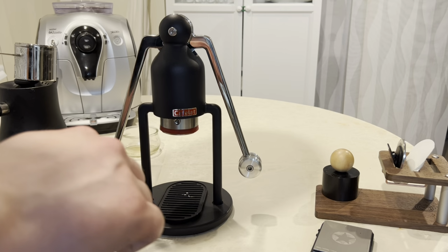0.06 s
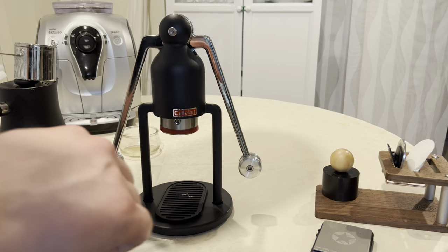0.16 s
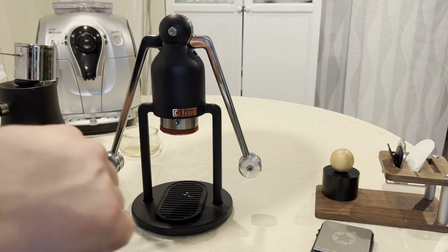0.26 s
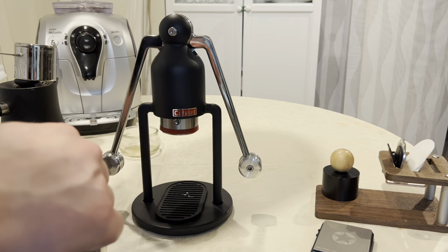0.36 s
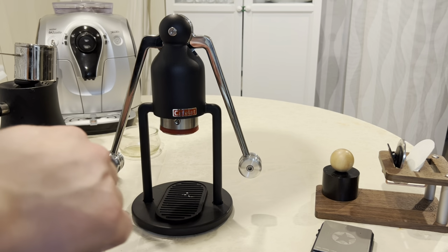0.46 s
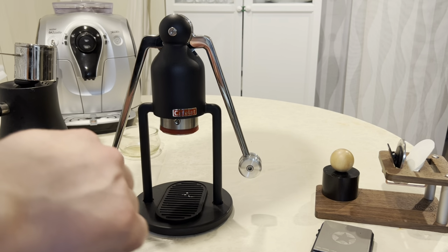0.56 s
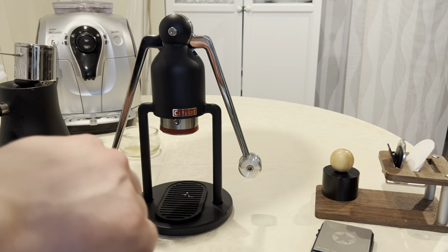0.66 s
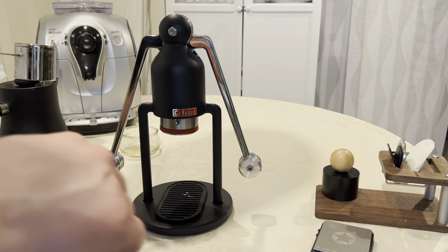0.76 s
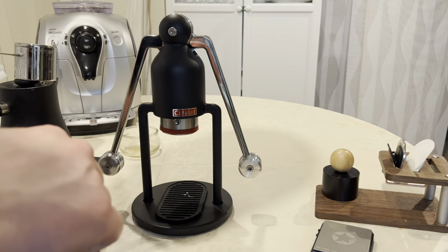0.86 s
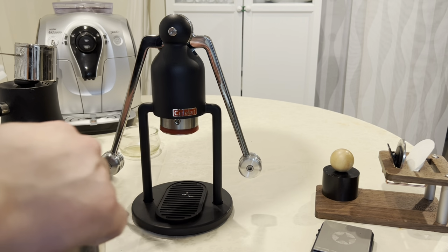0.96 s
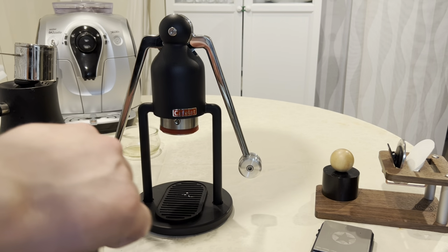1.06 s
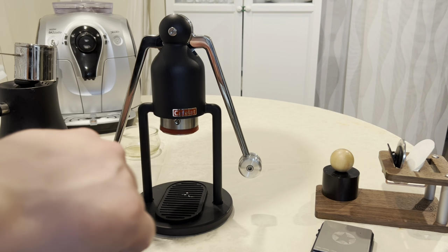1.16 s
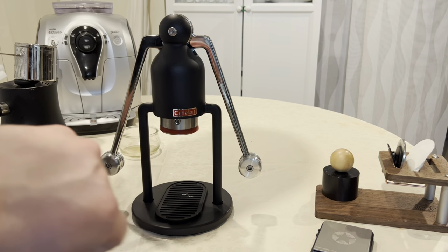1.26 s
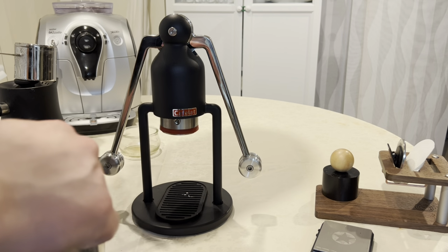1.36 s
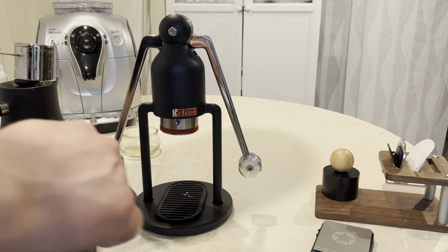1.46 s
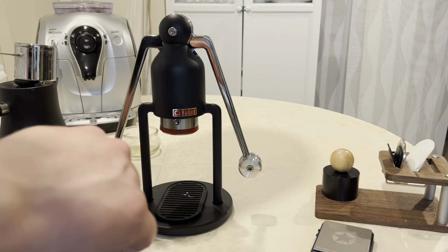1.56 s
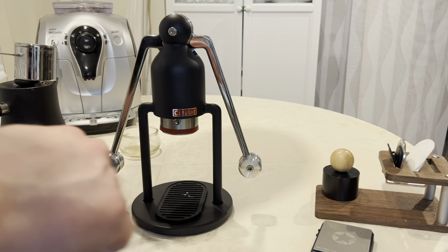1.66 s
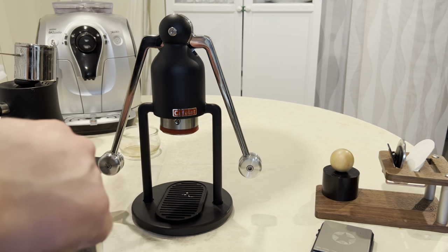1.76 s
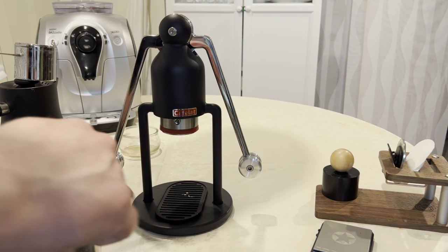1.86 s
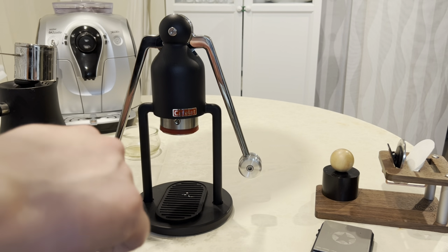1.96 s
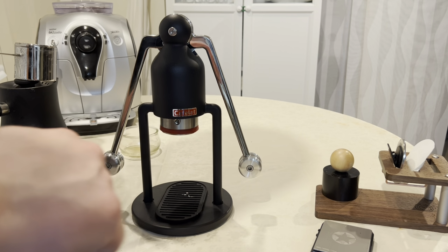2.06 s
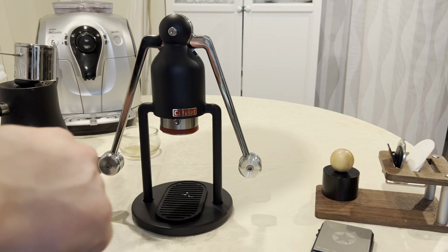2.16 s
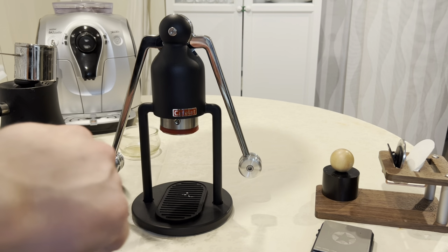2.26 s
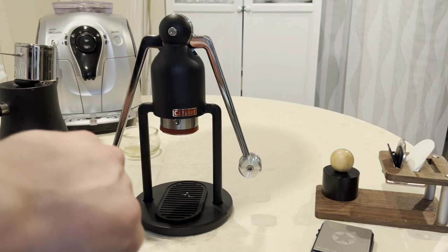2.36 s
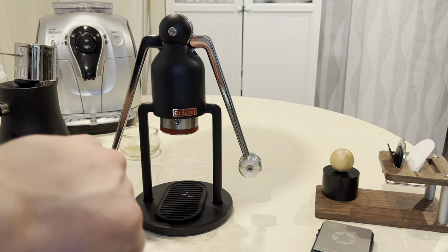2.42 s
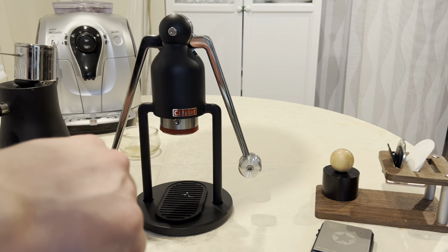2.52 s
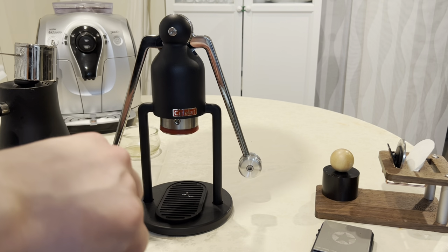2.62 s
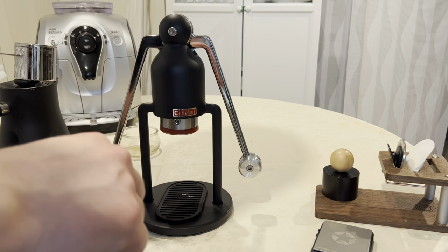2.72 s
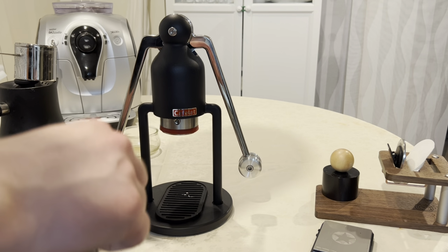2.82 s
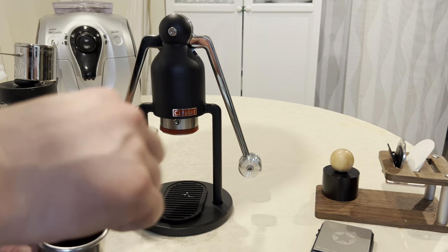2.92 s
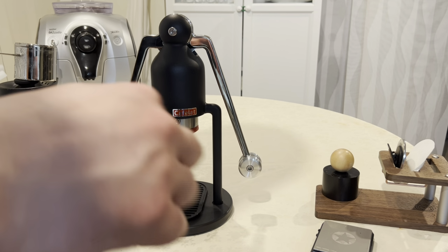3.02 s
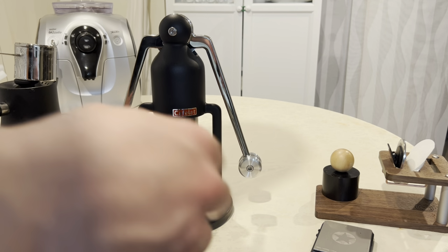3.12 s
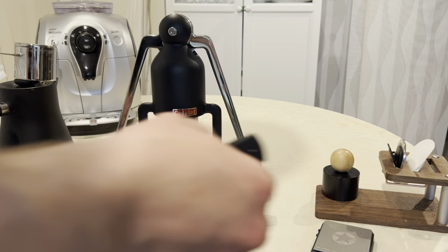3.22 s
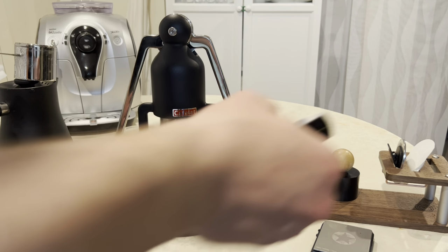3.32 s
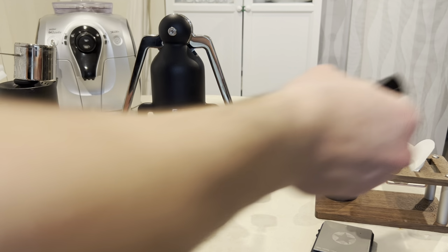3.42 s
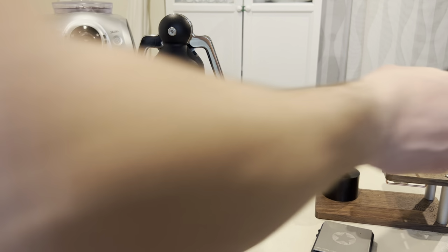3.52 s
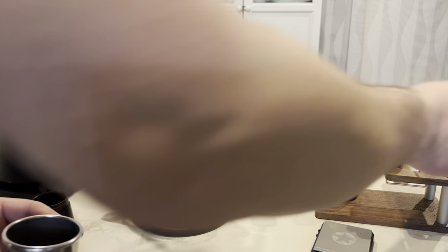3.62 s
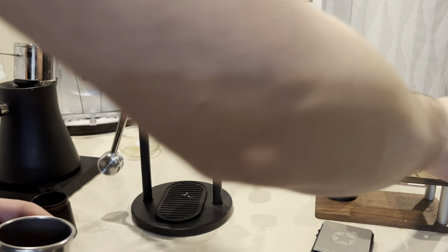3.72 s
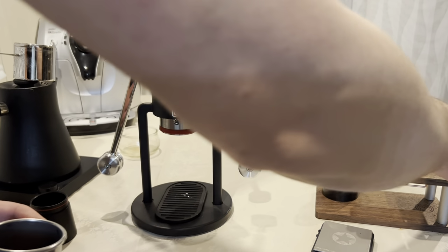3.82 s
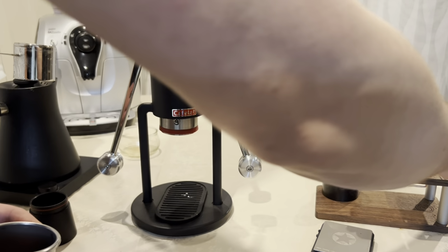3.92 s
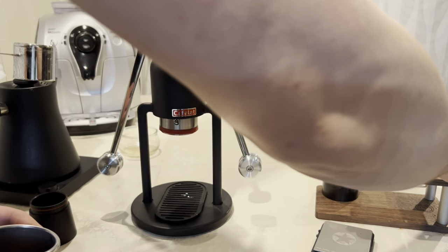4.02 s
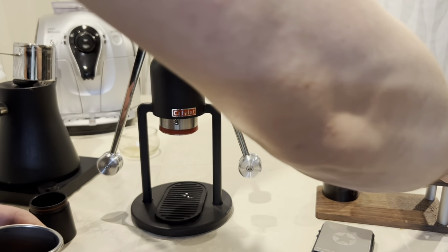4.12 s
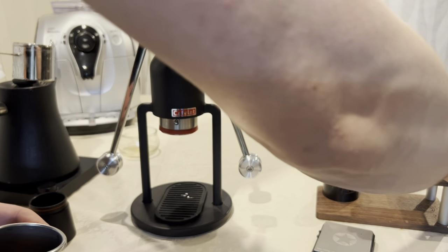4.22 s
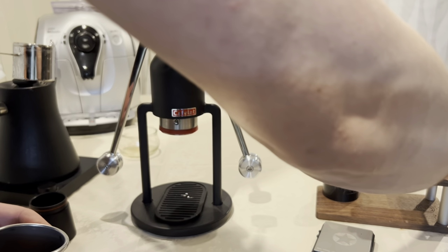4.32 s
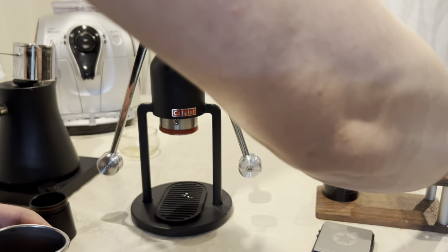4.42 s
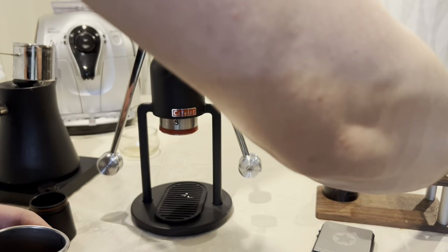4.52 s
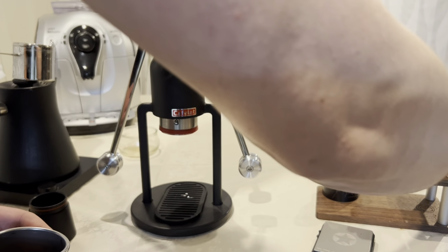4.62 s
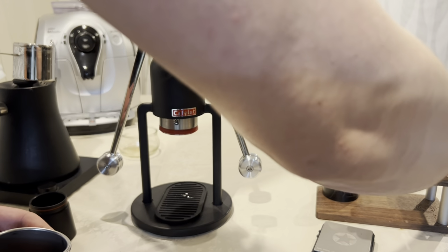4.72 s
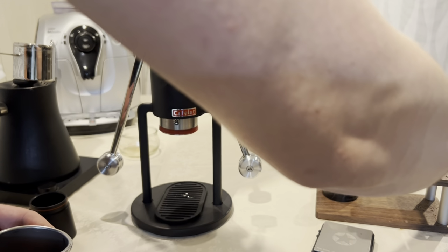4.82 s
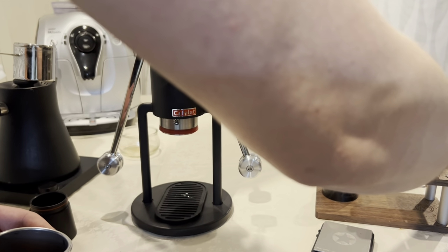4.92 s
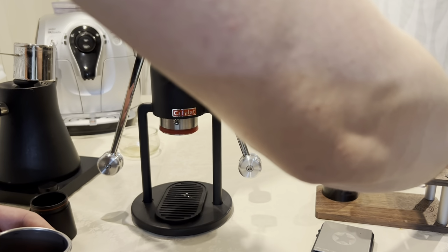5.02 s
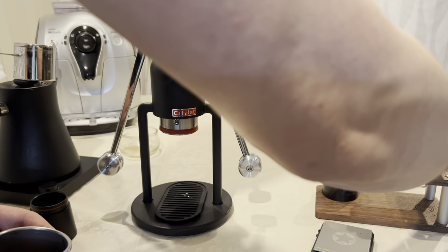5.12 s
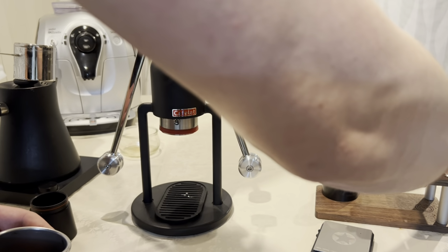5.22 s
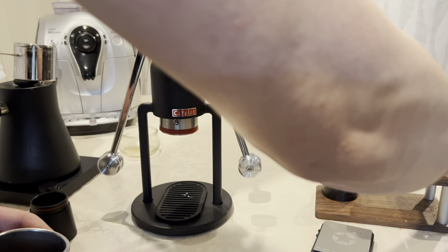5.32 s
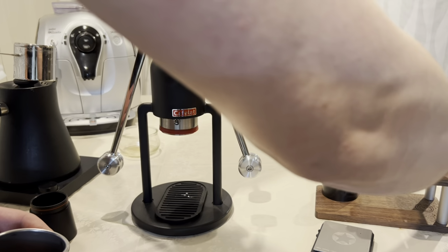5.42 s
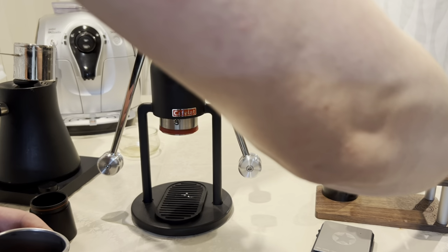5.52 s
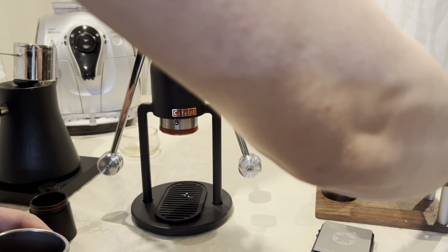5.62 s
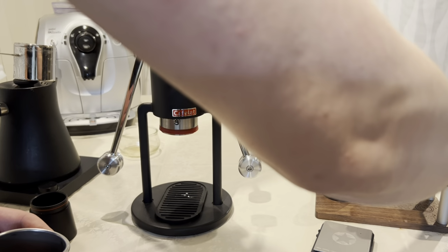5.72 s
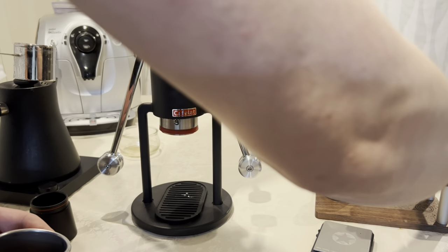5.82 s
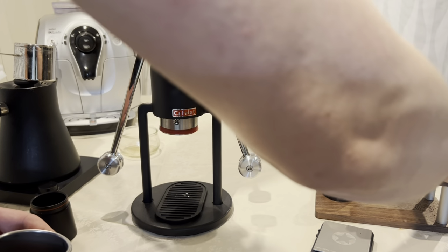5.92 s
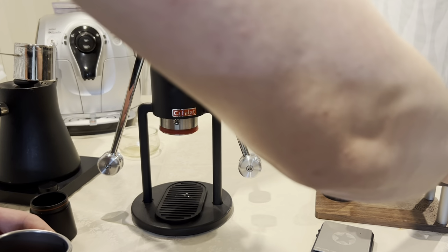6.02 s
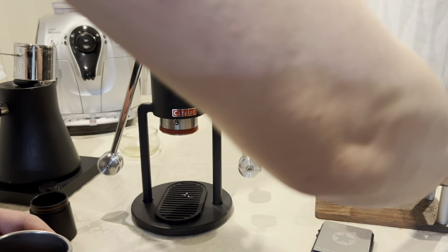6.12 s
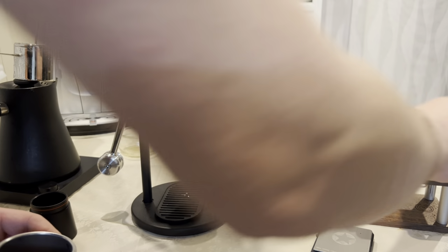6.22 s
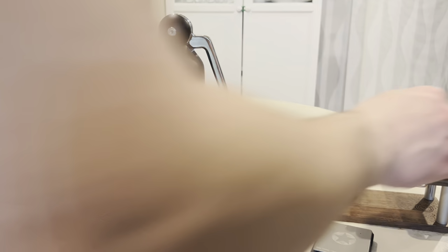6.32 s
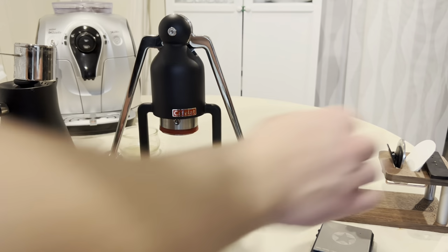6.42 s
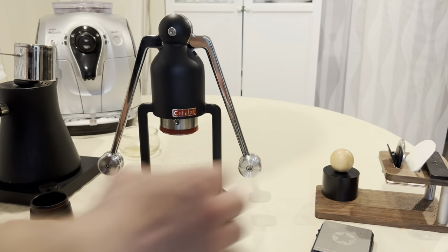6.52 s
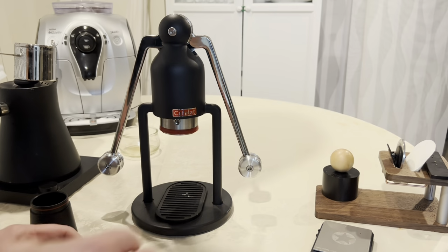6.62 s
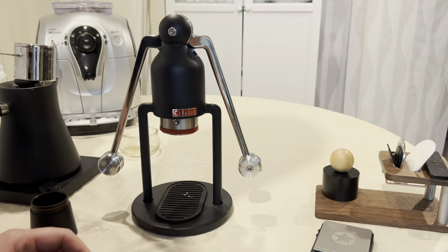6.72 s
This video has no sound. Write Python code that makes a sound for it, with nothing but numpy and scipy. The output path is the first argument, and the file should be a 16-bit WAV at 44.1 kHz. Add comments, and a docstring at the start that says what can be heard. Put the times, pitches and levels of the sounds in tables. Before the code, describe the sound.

From the start until about 2.5 seconds, fine needles stir ground coffee in a steel basket, close and slightly left. Uneven strokes make a soft, gritty crunch and a wavering hollow note, dotted with quick scrapes and ringing taps on the wall, sharpest near 0.8 and 2.3 seconds. Around 2.8 seconds the needles lift out with two tiny, high squeaks and faint twangs. After a lull, from about 3.9 to 5.6 seconds, they tick lightly and irregularly against their stand, a little further away, with a small ringing nudge and soft thud near 5 seconds. At 6 seconds the tool drops home with a brief rattling knock, the loudest sound, and a low thud through the table. It fades quickly in the small kitchen. Throughout there is a faint steady hiss and low background noise, which dips around 1 and 3 seconds and returns near 2.4 and 5.

```python
"""At a kitchen table, fine needles stir ground coffee in a steel basket, scraping and tapping its wall.
The grounds crunch, the basket hums a hollow note, and the needles squeak and twang as they are lifted out.
They tick against their stand while the tool is lined up. Then it drops home with a rattling knock
that thuds through the table. Under it all lie a faint hiss and low background noise
that the recorder's noise suppressor turns up and down."""
import sys
import numpy as np
from scipy import signal
from scipy.fft import rfft, irfft, next_fast_len
from scipy.io import wavfile
from scipy.ndimage import uniform_filter1d

SR = 44100
rng = np.random.default_rng(int(sys.argv[2]) if len(sys.argv) > 2 else 0)


def store_pcm(level_fs):
    """Save levels as 16-bit WAV."""
    pcm = np.round(np.clip(level_fs, -1, 1) * 32767).astype(np.int16)
    wavfile.write(sys.argv[1], SR, np.atleast_2d(pcm).T)


N = 298557
TIME = np.arange(N) / SR
SIDES = np.array([[1], [-1]])  # plus for the left ear, minus for the right

# The steel basket's modes, the tones it rings with. Each row: pitch in Hz, level in dB, seconds to
# fade by 60 dB (called t60), left minus right level in dB, how far the left wave leads in radians.
BASKET_MODES = [(704, -12.5, 0.054, 1.5, 6.5), (1054, 9, 0.024, 2, 2.5), (1207, -4, .025, -15, -1.96),
                (1534, -1.5, 0.014, 1.5, 2), (1686, -10, 0.056, 3, -1.3), (3432, -12.5, .03, 10, 4.2),
                (3681, -5.5, 0.034, 6, 0.4), (3850, -30.5, 0.066, 0.5, -0.4), (5043, -16.5, 0.03, 12, -0.5),
                (6150, -7, 0.042, 3.5, -2.5), (8340, -5.5, 0.012, 1, 1.67), (11100, -21.5, 0.02, 3.5, -6),
                (12000, 1.5, 0.021, -3, -9), (14000, -7, .008, -1, 3.5)]


def from_db(db):
    """Turn decibels into a number to multiply by."""
    return 10 ** (np.asarray(db) / 20)


def rms_one(x):
    """Scale a signal to an average power of 1."""
    return x / np.sqrt(np.mean(x ** 2) + 1e-20)


def at_hz(points, hz):
    """Read between a table's rows, with every octave equally wide."""
    known_hz, values = np.transpose(points)
    return np.interp(np.log(np.maximum(hz, 1)), np.log(known_hz), values)


def band(x, hz, kind, order=2):
    """Keep the lows, the highs or a band between two frequencies."""
    sections = signal.butter(order, np.clip(hz, 10, SR * .45), kind, fs=SR, output="sos")
    return signal.sosfilt(sections, x + 1e-18)


def drift(per_s):
    """Wander around zero, heading for a new random value per_s times a second."""
    targets = rng.standard_normal(2000)
    return np.interp(TIME * per_s, np.arange(len(targets)), targets)


def pan(db):
    """Left and right gains that make the left louder by db."""
    return from_db(SIDES * db / 2)


def stereo_noise(size, alike):
    """White noise for two ears: unrelated when alike is 0, the same when it is 1."""
    mid, side = rng.standard_normal((2, size))
    return (np.sqrt(1 + alike) * mid + np.sqrt(1 - alike) * side * SIDES) / np.sqrt(2)


def coloured(noise, colour):
    """Give noise its own balance of low and high sound, at a power of 1."""
    size = next_fast_len(noise.shape[1])
    gains = from_db(at_hz(colour, np.fft.rfftfreq(size, 1 / SR)))
    return rms_one(irfft(rfft(noise, size) * gains, size)[:, :noise.shape[1]])


def convolve(x, response):
    """Let every sample of x set off a copy of a stereo response."""
    return signal.oaconvolve(np.atleast_2d(x), response, axes=-1)[:, :N]


def ring(force, modes, vary_db=0):
    """A struck object rings in fading tones; vary_db wavers their levels as the contact point moves."""
    out = np.zeros((2, N))
    for hz, db, t60, pan_db, lead in modes:
        decay, turn = from_db(-60 / (t60 * SR)), 2 * np.pi * hz / SR
        push = force * from_db(db + vary_db * drift(25))
        swing = signal.lfilter([1], [1, -decay * np.exp(1j * turn)], push + 1e-18)
        out += pan(pan_db) * np.imag(swing * np.exp(.5j * lead * SIDES))
    return out


def crack(force, colour, t60, pan_db, alike):
    """A contact starts with a crowd of quickly dying tones, made here as a burst of noise."""
    t = TIME[:SR // 8]
    noise = coloured(stereo_noise(len(t), alike), colour)
    return convolve(force, pan(pan_db) * noise * from_db(-60 * t / t60))


def grains(per_s, spread_db):
    """Tiny slips of uneven size at random moments."""
    sizes = from_db(spread_db * np.minimum(rng.exponential(1, N), 4)) * rng.choice([-1, 1], N)
    return rms_one(sizes * (rng.random(N) < per_s / SR))


def contacts(rows, chatter, low_db, mid_db, high_db, low_follows=.35, length_s=.001):
    """Each contact is a click and a fading run of slips. Harder is brighter, as the bass grows less."""
    force, t = np.zeros((3, N)), TIME[:SR // 12]
    slips = grains(3000, spread_db=0.91)
    usual_db = np.mean([row[1] for row in rows])
    for start, db, treble_db, *own_length in rows:
        at = round(start * SR)
        length = own_length[0] if own_length else length_s
        burst = chatter * slips[at:at + len(t)] * np.exp(-(t / length) ** 2)
        burst[0] += 1  # the click
        levels = [[low_db + low_follows * (db - usual_db)], [db + mid_db], [db + treble_db + high_db]]
        force[:, at:at + len(t)] += from_db(levels) * burst / np.linalg.norm(burst)
    low, mid, high = force
    return band(low, [150, 1400], "band") - band(mid, [1300, 4700], "band") + band(high, 4700, "high")


def blows(rows):
    """One clean, sharp push for each row."""
    force = np.zeros(N)
    for start, db in rows:
        force[round(start * SR)] = from_db(db)
    return force


def gliding_noise(hz, width_hz):
    """Rubbing makes a breathy note around a moving pitch; the real part of the result is the sound."""
    decay = np.exp(-np.pi * width_hz / SR)
    slow_noise = signal.lfilter([1], [1, -decay], rng.standard_normal((2, N)))
    real, imaginary = rms_one(band(slow_noise, 2 * width_hz, "low", order=1))
    return (real + 1j * imaginary) * np.exp(2j * np.pi * np.cumsum(hz) / SR)


def background():
    """Low background noise that the recorder's noise suppressor turns up and down, and a steady hiss."""
    # How much low noise the suppressor lets through. Each row: time in seconds, level in dB.
    suppressor_levels = [(0, -57), (.79, -57), (.94, -70), (2.3, -65.5), (2.47, -59.5), (3.04, -57.5),
                         (3.1, -67.5), (3.5, -71.5), (4.5, -68.5), (5.1, -58.5), (6.77, -57)]
    # The colours of the two noises. Each row: frequency in Hz, relative level in dB.
    low_colour = [(15, -39), (25, -10.5), (55, -1.5), (160, -4.5), (186, -3), (210, -5), (237, -2.5),
                  (306, 3), (377, -8), (591, -17), (657, -32), (687, -39), (900, -26), (1170, -51.5),
                  (1980, -120)]
    hiss_colour = [(250, -29), (450, 0), (700, 3.5), (820, -6.5), (1100, -3.5), (1700, 0), (2500, -14.5),
                   (5500, -17.5), (8700, -21.5), (10300, -34.5), (11800, -18), (14000, -17), (16000, -25.5)]
    times, levels_db = np.transpose(suppressor_levels)
    suppressor_gain = from_db(np.interp(TIME, times, levels_db) - 1)
    low_noise = suppressor_gain * coloured(stereo_noise(N, alike=0.92), low_colour)
    hiss = from_db(-73) * pan(1.2) * coloured(stereo_noise(N, alike=0.12), hiss_colour)
    return low_noise + hiss


def swell(age, after, attack_s, t60):
    """Rise steadily, hold, then die away after the end."""
    return np.minimum(age / attack_s, 1) * from_db(-60 * after / t60)


def strokes(rest_hz=954.5, rise_hz=118, settle_s=.14):
    """Each stroke bites, eases off and stops. Gives the note's pitch, its gain and the grit's gain."""
    # Each row: start and end in seconds, note level in dB, grit level in dB, fade over the stroke in dB.
    hand_strokes = [(-0.06, 0.128, -50.5, -63.5, 4.5), (0.193, 0.264, -44, -55, 9),
                    (0.274, 0.4, -47.5, -56.5, 7), (0.471, 0.72, -44, -61, 12), (0.767, 0.986, -48, -62, 5),
                    (0.991, 1.23, -47, -59, 8), (1.217, 1.823, -52.5, -65, -0.5),
                    (1.839, 2.12, -49.5, -61, 3), (2.179, 2.36, -45, -69, 2.5),
                    (2.371, 2.474, -43.5, -99, 21.5)]
    hz, note, grit = np.full(N, rest_hz), 0, 0
    for start, end, note_db, grit_db, fade_db in hand_strokes:
        age, after = np.maximum(TIME - start, 0), np.maximum(TIME - end, 0)
        eased_db = fade_db * np.minimum(age / (end - start), 1)
        note = np.maximum(note, from_db(note_db - eased_db) * swell(age, after, attack_s=.035, t60=.16))
        # the grounds take longer to start and to stop moving
        grit = np.maximum(grit, from_db(grit_db - eased_db) * swell(age, after, attack_s=.047, t60=1))
        # the note starts high and settles as the needles loosen the grounds
        hz = np.where(age > 0, rest_hz + rise_hz * np.exp(-age / settle_s), hz)
    return hz, note, grit


def stirring(waver=.06, wander=0.038, lead_radians=0.23):
    """Needles plough the grounds: the basket hums a wavering hollow note and grit rings its steel."""
    hz, note_gain, grit_gain = strokes()
    hollow = gliding_noise(hz * (1 + waver * drift(45) + wander * drift(10)), width_hz=124)
    hollow = pan(6.4) * np.real(hollow * np.exp(.5j * lead_radians * SIDES))
    # the grit comes in clumps as the needles break through the grounds
    clumps = grit_gain * from_db(2.5 * drift(50))
    steel = from_db(-22) * ring(grains(2900, spread_db=5.5) * clumps, BASKET_MODES, vary_db=2.5)
    crunch = np.sqrt(np.abs(uniform_filter1d(grains(1800, spread_db=2.5) ** 2, size=40)))
    # The colour of the crunching grounds. Each row: frequency in Hz, relative level in dB.
    grit_colour = [(250, -27.5), (600, -12.5), (1100, 2.5), (1400, -5.5), (1650, 8), (2200, -2), (3100, -8),
                   (4500, -4.5), (6200, -11), (7200, -17), (11000, -17), (13500, -4.5), (15500, -33)]
    grounds = clumps * crunch * pan(6) * coloured(stereo_noise(N, alike=0.47), grit_colour)
    return note_gain * from_db(-3 + drift(25)) * hollow + steel + grounds


def basket_hits():
    """Needles scrape and tap the steel wall and make it ring."""
    # Each row: start in seconds, level in dB, extra treble in dB and, for scrapes, length in seconds.
    scrapes = [(0.029, -46.5, -41, 0.0061), (0.1175, -36.5, -18, 0.0055), (0.181, -44.5, -33, 0.0047),
               (0.2095, -41, -8, .011), (0.2935, -43.5, -34, 0.0059), (0.5842, -43, -5, 0.029),
               (0.7044, -45, -42, .011), (0.7785, -31, -39, 0.007), (0.791, -31.5, -20, 0.0065),
               (0.828, -48, 2, 0.013), (0.877, -47.5, -11, 0.01), (1.06, -46.5, -20, 0.0067),
               (1.0887, -38.5, -24, 0.017), (1.2435, -34, -11, 0.012), (1.2554, -44.5, 1, .006),
               (1.3218, -46, -5, 0.023), (1.5118, -42.5, -24, 0.015), (1.6785, -41.5, -4, 0.0063),
               (1.922, -41, -7, 0.0052), (2.081, -39, -7, 0.0042), (2.2386, -43, -0.5, 0.03)]
    taps = [(0.5219, -37.5, -3.5), (0.5286, -45.5, -14), (0.782, -37.5, -14), (1.1855, -48.5, -33),
            (1.426, -53.5, -36), (2.0765, -39.5, -23), (2.286, -28.5, -1), (2.3, -33.5, -9),
            (2.482, -53.5, -45), (2.6932, -55.5, -44)]
    # The colour of the basket's crack. Each row: frequency in Hz, relative level in dB.
    crack_colour = [(200, -29.5), (500, -9), (1000, -0.5), (1700, 8), (2600, 2.5), (4500, 1.5),
                    (6200, -0.5), (7200, 2.5), (11000, -2.5), (13500, -2.5), (16000, -4)]
    scrape = contacts(scrapes, chatter=0.23, low_db=-50, mid_db=0, high_db=-3.5, low_follows=.3)
    tap = contacts(taps, chatter=0.081, low_db=-42.5, mid_db=-5, high_db=5,
                   low_follows=0.74, length_s=0.00027)
    rasp = from_db(-1) * crack(scrape, crack_colour, t60=0.014, pan_db=4.5, alike=.5)
    snap = from_db(0.5) * crack(tap, crack_colour, t60=0.021, pan_db=1, alike=1)
    return ring(scrape + tap, BASKET_MODES) + rasp + snap


def glides(rows):
    """Pitch and gain of short slides: each swells and fades while its pitch moves steadily."""
    hz, gain = np.full(N, float(rows[0][2])), np.zeros(N)
    for start, length, first_hz, last_hz, db in rows:
        along = np.clip((TIME - start) / length, 0, 1)
        hz = np.where(along > 0, first_hz + (last_hz - first_hz) * along, hz)
        gain += from_db(db) * np.sin(np.pi * along)
    return hz, gain


def needle_squeaks():
    """Sliding needles sing briefly, gliding in pitch as their free length changes."""
    # Slides along the wall, then squeaks on leaving the basket.
    # Each row: start and length in seconds, first and last pitch in Hz, level in dB.
    wall_slides = [(1.017, .055, 1850, 1400, -54), (1.087, .035, 1770, 1760, -52.5),
                   (1.179, .016, 1665, 1605, -46), (2.195, .09, 2080, 1720, -54)]
    exit_squeaks = [(2.752, 0.073, 8060, 8500, -73), (2.82, .046, 8860, 7270, -70)]
    slide_hz, slide_gain = glides(wall_slides)
    squeak_hz, squeak_gain = glides(exit_squeaks)
    slide = slide_gain * gliding_noise(slide_hz, width_hz=100).real
    squeak = gliding_noise(squeak_hz, width_hz=360).real
    overtone = from_db(6) * gliding_noise(1.64 * squeak_hz, width_hz=1600).real
    return pan(6) * slide + squeak_gain * (squeak + overtone)


def needle_twangs():
    """A needle springs free of the rim and rings as it bends back and forth."""
    # Each row: start in seconds, level in dB.
    releases = [(2.767, -73.5), (2.855, -65)]
    bending_mode = (3610, 0, 0.12, 3.4, 0.52)  # laid out like a row of BASKET_MODES
    return ring(blows(releases), [bending_mode])


def lining_up(needle_count=4, pitch_spread=0.04):
    """Needles of slightly different pitch, and the handle, touch the stand as the tool is lined up."""
    # Touches on the stand. Each row: start in seconds, level in dB, extra treble in dB.
    needle_ticks = [(3.8934, -73.5, 1.5), (4.1624, -57, -3), (4.2053, -56.5, 4), (4.3236, -67, -1),
                    (4.3752, -61.5, 4.5), (4.433, -63, -5), (4.459, -48.5, -1), (4.5281, -55, -28),
                    (4.7273, -49, -7.5), (4.79, -51.5, -6), (4.9604, -59, -9), (5.385, -47.5, -3.5),
                    (5.4165, -48, -35), (5.556, -65.5, 15.5)]
    handle_nudges = [(5.0595, -43, -14.5), (5.143, -75, 11), (5.2614, -61, -22)]
    # The tones of the needles and of the free handle.
    # Each row: pitch in Hz, level in dB, t60 in seconds, left minus right in dB, left lead in radians.
    needle_modes = [(3140, -19.5, 0.061, -1, 0.0011), (3540, -12.5, 0.011, 12, 0.52),
                    (6030, -10, 0.016, -3, 0.82), (7500, -30, 0.011, -5, 0.67),
                    (8690, -9, 0.038, -14, 0.61)]
    handle_modes = [(1082, 0.5, 0.11, 3, 0), (2132, -0.5, 0.075, 4.5, 0.045), (2560, -38, 0.028, 4, 0),
                    (3360, 2.5, 0.038, 5, 0.24)]
    # The colour of the needles' crack. Each row: frequency in Hz, relative level in dB.
    crack_colour = [(600, -5), (2000, -10), (3200, -2), (5000, -6.5), (8600, 1.5), (10500, -11), (13000, 2),
                    (16000, -1)]
    ticks = [contacts(needle_ticks[k::needle_count], chatter=0.74, low_db=-92, mid_db=1, high_db=0.5,
                      length_s=0.0043) for k in range(needle_count)]
    needles = 0
    for tick, detune in zip(ticks, np.linspace(-1, 1, needle_count)):
        modes = [(hz * (1 + pitch_spread * detune), *rest) for hz, *rest in needle_modes]
        needles = needles + ring(tick, modes, vary_db=2.5)
    nudge = contacts(handle_nudges, chatter=0.06, low_db=-90, mid_db=-8, high_db=1.5,
                     low_follows=0.66, length_s=0.003)
    snap = from_db(0.5) * crack(sum(ticks) + nudge, crack_colour, t60=0.013, pan_db=6, alike=0.31)
    # the needles rub on for a moment after each touch
    rustle = from_db(-10.5) * crack(sum(ticks), crack_colour, t60=0.14, pan_db=9, alike=0.57)
    return needles + ring(nudge, handle_modes) + snap + rustle


def table_thuds():
    """The rocking stand sets the table top booming."""
    # Each row: start in seconds, level in dB.
    thuds = [(5.062, -52), (5.089, -57), (5.999, -47), (6.011, -39.5), (6.039, -37.5), (6.0845, -39)]
    # The table top's two low tones, laid out like BASKET_MODES.
    table_modes = [(179, -1.5, 0.21, 0.0012, 0.025), (216.3, -1.7, 0.24, 0.0078, 0.001)]
    return ring(blows(thuds), table_modes)


def dropping_home():
    """The tool drops into the stand and rattles to rest."""
    # The drop and its bounces. Each row: start in seconds, level in dB, extra treble in dB.
    knocks = [(5.9942, -21, -15), (5.998, -40.5, -8), (6.006, -28, -10), (6.011, -22, -12.5),
              (6.018, -23.5, -19.5), (6.0575, -24.5, -8.5), (6.064, -47.5, -6), (6.072, -30, -22),
              (6.098, -53, 9)]
    # The tones of the stand with the tool in it.
    # Each row: pitch in Hz, level in dB, t60 in seconds, left minus right in dB, left lead in radians.
    stand_modes = [(400, -9, .08, 7, -0.097), (659, -16, 0.055, -3.5, -0.22),
                   (953, -6.5, 0.12, -0.5, -0.49), (1063, -21, 0.038, -0.5, -.3),
                   (1277, -4, 0.059, -3, -0.14), (1490, -8.5, 0.13, -6.5, 0), (1960, 2.5, .09, 0, 0),
                   (2023, -12.5, 0.14, 1.5, -0.07), (2150, -8, 0.088, 3.5, -0.12),
                   (2033, -7, 0.06, 2, 0.92), (2110, -9, .13, -0.5, 0.093),
                   (2440, -14.5, 0.066, 1.5, 0.093), (2320, -27.5, 0.11, 1, 0), (2680, -18.5, .09, 1, 0.5),
                   (2780, -2.5, 0.046, 2.5, -0.41), (3010, -21, 0.062, -1.5, 0.32),
                   (3130, -17.5, 0.085, 0, .3), (3600, -31, 0.17, 5, .3), (3900, -15, 0.13, 10.5, 1.5),
                   (4225, -27, 0.22, 13, 0.35), (5800, -29.5, 0.142, 14.5, 0.41),
                   (6010, -29.5, 0.31, 17.5, -0.18), (8530, -12, 0.077, 8, -0.28)]
    # The colour of the stand's crack. Each row: frequency in Hz, relative level in dB.
    crack_colour = [(120, -29), (550, -4.5), (1200, 17.5), (1650, -2), (2100, 6), (2500, -1), (2900, 8),
                    (4500, 0), (7000, 1), (10000, -10.5), (14000, 4), (16000, -6)]
    force = contacts(knocks, chatter=0.044, low_db=-38.5, mid_db=-4, high_db=-6,
                     low_follows=0.2, length_s=0.0021)
    ringing = ring(force, stand_modes, vary_db=-1)
    return ringing + from_db(2) * crack(force, crack_colour, t60=0.053, pan_db=2, alike=0.16)


def room(x, tail_db, early_db, echoes_per_s=1500):
    """Add quick echoes from table and appliances, then a tail whose treble dies first."""
    # Each row: frequency in Hz, seconds the tail takes to fade by 60 dB.
    fade_times = [(150, .4), (1000, 0.33), (3000, 0.34), (6000, 0.33), (14000, 0.12)]
    t, edges_hz = TIME[:SR * 2 // 3], np.geomspace(60, 17000, 10)
    tail = 0
    for low, high in zip(edges_hz, edges_hz[1:]):
        noise = band(stereo_noise(len(t), alike=.95 if high < 450 else .3), [low, high], "band")
        tail = tail + noise * from_db(-60 * t / at_hz(fade_times, np.sqrt(low * high)))
    tail = tail * np.clip((t - .005) / 0.0062, 0, 1)  # builds up after a short gap
    arrivals = (rng.random(len(t)) < echoes_per_s / SR) * (t > .002)
    early = stereo_noise(len(t), alike=.5) * arrivals * np.exp(-t / .018)
    response = (from_db(tail_db) * rms_one(tail) + from_db(early_db) * rms_one(early)) / np.sqrt(len(t))
    return x + convolve(x, response)


def scene():
    """The basket is close on the left, the stand further off."""
    at_basket = stirring() + needle_squeaks() + needle_twangs() + basket_hits()
    near = pan(0.27) * room(at_basket, tail_db=-10, early_db=-10.5)
    far = room(lining_up() + dropping_home() + table_thuds(), tail_db=-8.5, early_db=-13.5)
    return near + far + background()


def record(dry, port_hz=10100, port_width_hz=1600, lowest_hz=36, highest_hz=15800):
    """The microphones pull the high treble toward the middle and cut the deepest and highest sound."""
    mid, side = (dry[0] + dry[1]) / 2, (dry[0] - dry[1]) / 2
    side = .3 * side + .7 * signal.sosfiltfilt(signal.butter(3, 7800, fs=SR, output="sos"), side)
    # the right microphone's opening (its port) resonates, shifting the wave's timing but not its level
    decay = np.exp(-np.pi * port_width_hz / SR)
    port = [1, -2 * decay * np.cos(2 * np.pi * port_hz / SR), decay * decay]
    right = signal.lfilter(port[::-1], port, mid - side)
    both = band(np.array([mid + side, right]), lowest_hz, "high", order=4)
    return signal.sosfilt(signal.ellip(10, .2, 80, highest_hz, fs=SR, output="sos"), both)


dry = scene()
out = record(dry)
store_pcm(out)
```